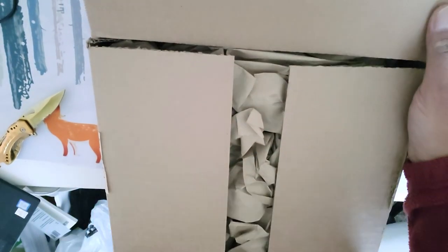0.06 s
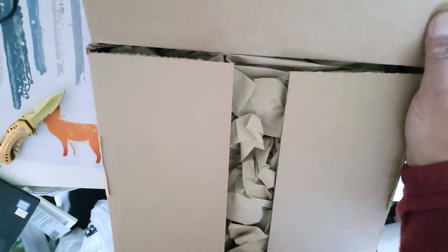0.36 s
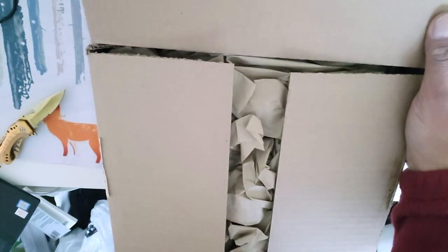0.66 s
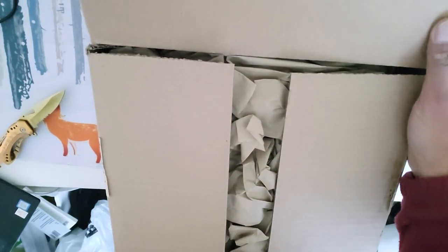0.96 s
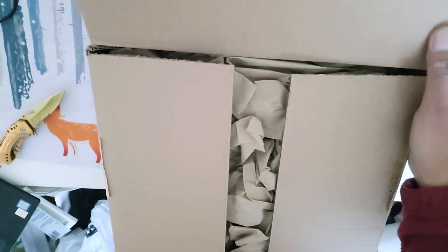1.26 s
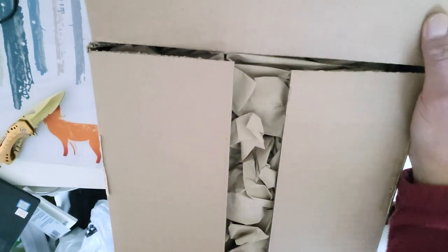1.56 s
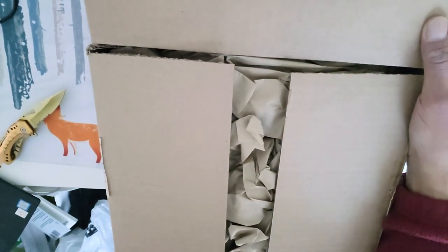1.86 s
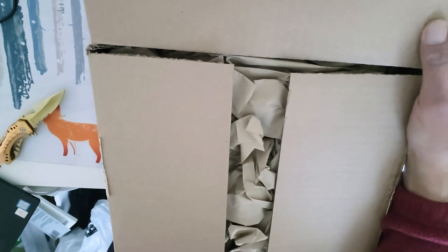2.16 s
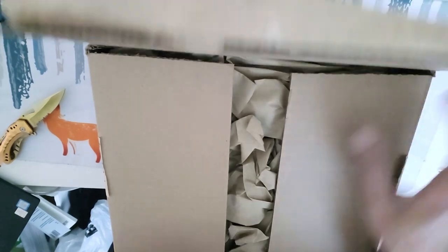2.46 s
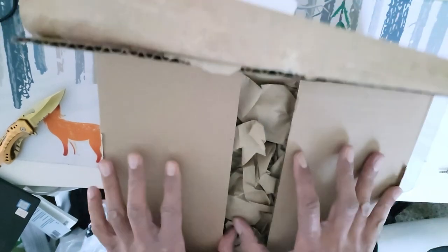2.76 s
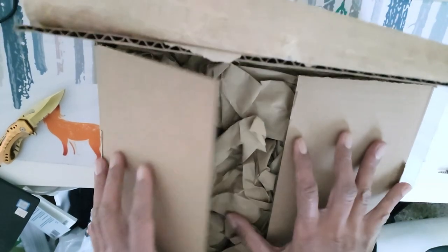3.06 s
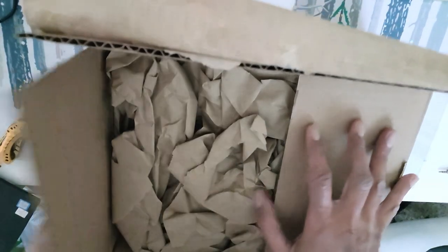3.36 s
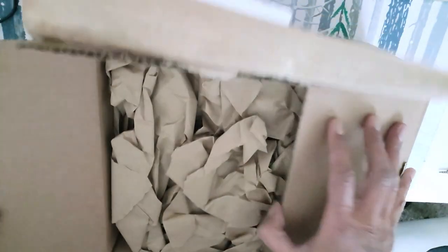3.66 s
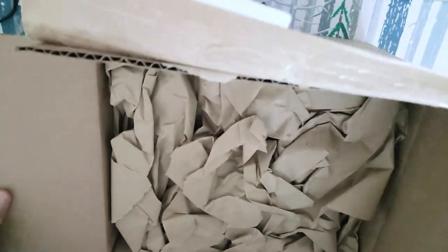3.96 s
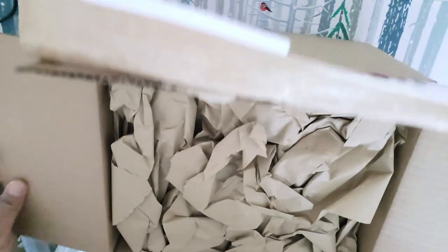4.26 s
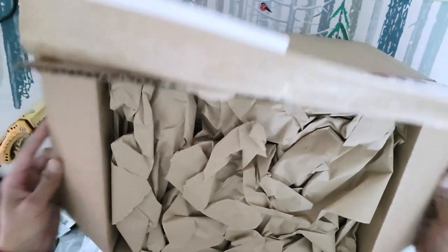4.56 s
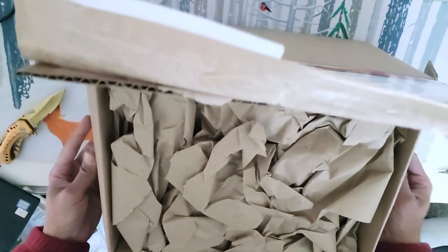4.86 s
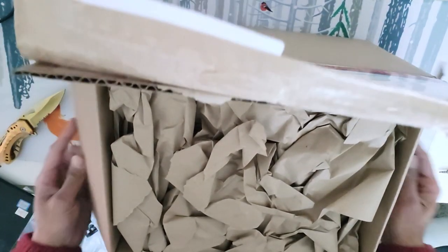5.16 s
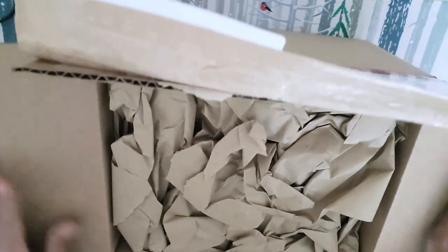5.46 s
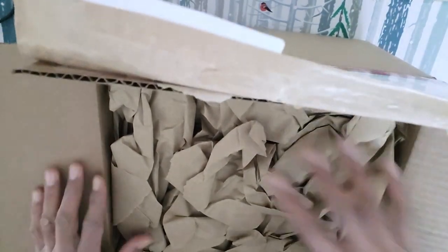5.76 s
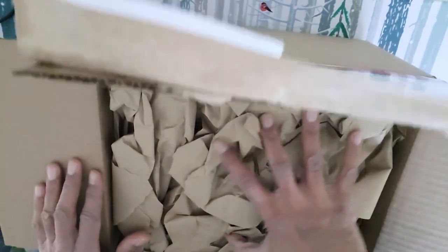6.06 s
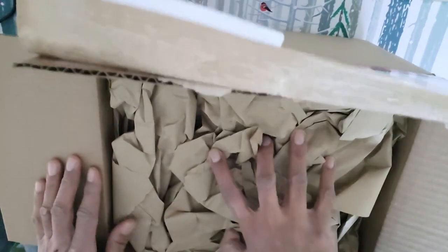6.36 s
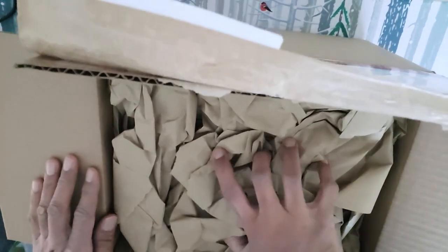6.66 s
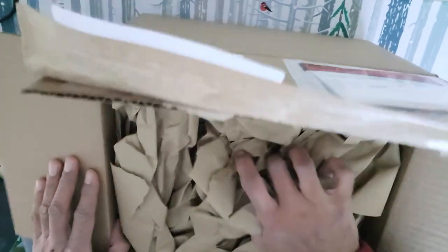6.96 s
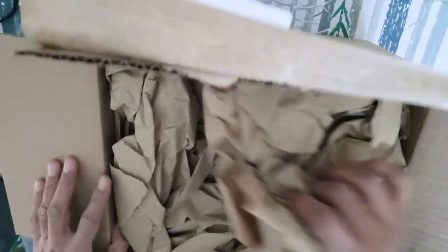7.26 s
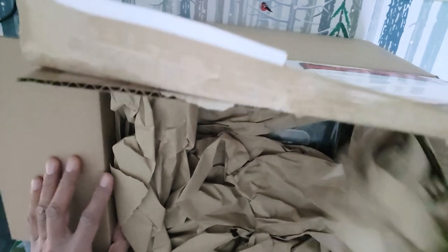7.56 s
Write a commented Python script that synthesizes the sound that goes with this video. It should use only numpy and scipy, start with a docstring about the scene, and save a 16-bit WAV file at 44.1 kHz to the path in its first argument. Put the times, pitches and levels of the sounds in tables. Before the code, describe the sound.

Heard from close by in a quiet little room, skin brushes and briefly judders across a hollow cardboard box. A few taps and clicks follow, then the flaps are folded back in several rasping drags. The last part is the busiest: crumpled paper filling is pushed and grabbed, crinkling densely with dry cracks and a low thump against the box, and it thins out as a wad comes free.

```python
"""Hands slide over a cardboard box and fold its flaps open: rubbing card hisses over the box's hollow tones,
with edge clicks, wall thumps and brief judders as a surface sticks and slips.
Then they press into crumpled packing paper and pull a wad out; it crackles, snaps and collapses in bursts.
A small, quiet room, heard from close by through two microphone ports."""
import sys
import numpy as np
from scipy import signal
from scipy.fft import rfft, irfft
from scipy.io import wavfile
from scipy.ndimage import uniform_filter1d

SR = 44100
rng = np.random.default_rng(int(sys.argv[2]) if len(sys.argv) > 2 else 0)


def transcribe(u):
    """Save the signal u as a 16-bit wav file named by the first command-line argument.

    u: samples, shape (n,) or (channels, n), limited to [-1, 1]; the rate is SR.
    q: integer samples, one column per channel.
    """
    v = np.clip(np.atleast_2d(u).T, -1, 1)
    q = np.round(v * 32767).astype(np.int16)
    wavfile.write(sys.argv[1], SR, q)


N = 343980
TIME, HZ = np.arange(N) / SR, np.fft.rfftfreq(N, 1 / SR)


def amp(db):
    """Decibels to gain."""
    return 10 ** (np.asarray(db) / 20)


def unit(x):
    """Scales to rms 1."""
    return x / np.sqrt(np.mean(x ** 2) + 1e-20)


def curve(points, hz):
    """Reads a table along a logarithmic frequency axis."""
    freqs, values = np.transpose(points)
    return np.interp(np.log(hz + 1), np.log(freqs + 1), values)


def band(hz, lo, hi, order=8):
    """Gain of a pass band with steep skirts."""
    return ((1 + (lo / (hz + 1)) ** order) * (1 + (hz / hi) ** order)) ** -.5


def eq(x, gain):
    """Filters a full-length sound by a gain for each frequency."""
    return irfft(rfft(x) * gain, N)


def add(mix, start_s, sound):
    """Mixes a sound in at its cue."""
    part = mix[:, max(round(start_s * SR), 0):][:, :sound.shape[-1]]
    part += sound[..., :part.shape[1]]


def pulse(t, rise):
    """An envelope that peaks at 1 after the rise time and then dies away."""
    return t / rise * np.exp(1 - t / rise)


# EQ of the quiet room: (frequency [Hz], gain [dB])
ROOM_TONE_EQ = [(12, -30), (20, -2), (472, -2), (873, -13), (1570, -18), (2020, -19), (3250, -12),
                (6910, -18), (7730, -18), (11100, -21), (16000, -25)]
def room_tone(level_db=-69.5):
    """A faint, steady bed of dark noise."""
    noise = rng.standard_normal((2, N))
    return amp(level_db) * unit(eq(noise, amp(curve(ROOM_TONE_EQ, HZ))))


# reverb time of the room: (frequency [Hz], time to fall 60 dB [s])
ROOM_T60 = [(150, 0.52), (600, 0.51), (3500, 0.33), (9000, 0.15), (16000, 0.084)]
def reverb(send, predelay_s=0.0013):
    """The room's diffuse tail, each band dying at its own speed."""
    hz, t, spectra = signal.stft(rng.standard_normal((2, SR // 2)), SR, nperseg=256)
    fade = amp(-60 * t / curve(ROOM_T60, hz)[:, None])
    tail = signal.istft(spectra * fade, SR, nperseg=256)[1]
    tail *= np.clip(np.arange(tail.shape[1]) / SR / predelay_s - 1, 0, 1)
    return signal.fftconvolve(send, tail / np.linalg.norm(tail[0]), axes=1)[:, :N]


# a sticking surface: (time [s], level [dB], pitch [Hz], bandwidth [Hz], rise [s])
JUDDER_CUES = [(0.345, -39, 604, 160, 0.035), (0.384, -39, 253, 69.6, 0.016),
               (1.185, -55.5, 584, 110, 0.019), (1.244, -48.5, 970, 600, 0.019),
               (2.336, -41.5, 497, 160, 0.0089), (2.52, -49, 151, 25, 0.066),
               (4.373, -40, 4870, 700, 0.0063), (4.920, -68, 385, 30, 0.037), (5.07, -68, 470, 120, .03),
               (7.052, -33, 1370, 700, 0.01), (7.297, -29, 453, 162, 0.014), (7.33, -38.5, 356, 222, 0.023)]
def judders():
    """Stick and slip locks briefly to one narrow resonance."""
    out, t = np.zeros((2, N)), np.arange(8192) / SR
    hz = np.fft.rfftfreq(8192, 1 / SR)
    for start, db, pitch, width, rise in JUDDER_CUES:
        tone = irfft(rfft(rng.standard_normal(8192)) / (1 + (2 * (hz - pitch) / width) ** 2))
        envelope = pulse(t, rise) * (1 - (t / t[-1]) ** 2)
        add(out, start, amp(db) * unit(tone * envelope) * np.sqrt(np.mean(envelope ** 2)))
    return out


# blows on the box walls: (time [s], level [dB], pitch [Hz], energy decay [s])
THUMP_CUES = [(1.405, -25.5, 440, 0.0023), (2.604, -24.5, 250, 0.0022), (2.613, -26, 146, 0.0045),
              (2.692, -35, 111, 0.0076), (3.934, -21, 873, 0.0019), (4.370, -31.5, 860, 0.0023),
              (5.691, -43, 55.4, 0.018), (5.767, -38, 98, 0.0071), (6.321, -33, 72, 0.0039),
              (6.889, -21, 64, 0.0092)]
def wall_thumps():
    """A struck wall swings a few times, with a weaker overtone."""
    out, t = np.zeros((2, N)), np.arange(SR // 4) / SR
    for start, db, hz, decay in THUMP_CUES:
        swing = np.sin(2 * np.pi * hz * t) + 0.26 * np.sin(2 * np.pi * hz * 1.4 * t)
        envelope = np.exp(-t / (2 * decay)) * (1 - np.exp(-t * hz * 4))
        add(out, start, amp(db) * swing * envelope)
    return out


# resonances of the open box and its flaps: (centre [Hz], width [Hz], lift at depth 1 [dB])
OPEN_BOX_MODES = [(252, 27, 0), (363, 24, 8), (485, 19, 8), (659, 110, 6), (722, 26, 9), (900, 27, 7),
                  (1136, 290, 6.5), (1464, 170, 8.5), (1750, 59, 4.5), (2540, 180, 4.5), (2660, 170, 0),
                  (3540, 140, 1)]
def box_lift(depth, modes=OPEN_BOX_MODES):
    """The box's resonances in dB at each frequency, deeper the less it is damped."""
    return depth * sum(db / (1 + (2 * (HZ - hz) / width) ** 2) for hz, width, db in modes)


def grains(per_s, spread_db, decay_s, tint, patches=20):
    """Tiny slips or buckles of uneven size; each patch of the sheet has its own short ring."""
    t, out = np.arange(512) / SR, np.zeros((2, N + 512))
    hz = np.fft.rfftfreq(512, 1 / SR)
    sizes = amp(spread_db * np.minimum(rng.exponential(1, N), 4))
    hits = sizes * (rng.random(N) < per_s / SR)
    patch = rng.integers(0, patches, N)
    for k, centre_hz in enumerate(np.geomspace(500, 12000, patches)):
        lift = 1 + tint * np.exp(-np.log2((hz + 1) / centre_hz) ** 2 * 2)
        ring = irfft(rfft(rng.standard_normal((2, 512))) * lift) * np.exp(-t / decay_s)
        out[:, 1:] += signal.oaconvolve((hits * (patch == k))[None], ring, axes=1)
    return unit(out[:, :N])


def smooth(x, span, axis=0):
    """Two passes of a moving average."""
    size = max(round(span), 1)
    return uniform_filter1d(uniform_filter1d(x, size, axis), size, axis)


def shifting_contact(x, depth_db, span_s, clump_db, width_hz=260):
    """As the contact shifts, different patches of the sheet sound, and the slips come in clumps."""
    hz, t, spectra = signal.stft(x, SR, nperseg=512)
    frames = span_s * SR / 256
    patches = smooth(rng.standard_normal(spectra.shape[1:]), width_hz / hz[1])
    patches = unit(smooth(patches, frames, axis=1))
    clumps = unit(smooth(rng.standard_normal(len(t)), frames))
    flicker_db = np.clip(depth_db * patches + clump_db * clumps, -9, 6)
    return signal.istft(spectra * amp(flicker_db), SR, nperseg=512)[1][:, :N]


# how far each register follows a stroke's brightness: (rumble, body, scrape, hiss) [dB per dB]
BRIGHTNESS_TILT = [-0.2, -0.92, -0.095, 0.88]
def stroke_gains(t, peak_s, db, rise, fall, bright_db, rasp_db=0, rumble_db=0):
    """One movement swells and fades, 8.5 dB over its rise or fall; the touch balances the registers."""
    from_peak = np.maximum((peak_s - t) / rise, (t - peak_s) / fall)
    swell_db = db - 8.5 * from_peak ** 1.29  # the exponent rounds the top
    touch_db = bright_db * np.array(BRIGHTNESS_TILT) + [rumble_db, 0, rasp_db, 0]
    return np.outer(amp(touch_db), amp(swell_db))


# registers of wall rumble, hollow body, scrape or crackle, and hiss: (low edge [Hz], high edge [Hz])
REGISTER_BANDS = [(30, 220), (220, 850), (850, 3200), (3200, 16500)]
def rub(friction, strokes, eq_db, trims_db):
    """Colours a friction texture and rides its four registers with the strokes, each with a level trim."""
    t = TIME[::32]
    swells = np.sqrt(sum(stroke_gains(t, *stroke) ** 2 for stroke in strokes))
    spectrum, out = rfft(friction) * amp(eq_db), 0
    for (lo, hi), swell, trim in zip(REGISTER_BANDS, swells, trims_db):
        register = unit(irfft(spectrum * band(HZ, lo, hi), N))
        out = out + register * np.interp(TIME, t, swell) * amp(trim)
    return out


def snaps(cues, trims_db, tone_db, width_octaves, rattle_db, box_depth, ring_db):
    """A stiff facet jumps: a sharp burst, a few cycles at its pitch, a faint rattle between box walls."""
    out, t = np.zeros((2, N)), np.arange(1024) / SR
    hz = np.fft.rfftfreq(1024, 1 / SR)
    box_db = np.interp(hz, HZ, box_lift(box_depth))
    attack = 1 - np.exp(-t / .0002)
    rattle = amp(rattle_db) * pulse(t, rise=.003)
    span_gain = np.sqrt(.005 / t[-1])  # levels are rms over 5 ms
    registers = REGISTER_BANDS[1:]  # body, scrape, hiss
    centres = np.sqrt(np.prod(registers, axis=1))
    for start, peak_db, pitch, skirt, decay in cues:
        register_octaves = abs(np.log2(centres / pitch))
        levels_db = peak_db - skirt * (register_octaves - register_octaves.min())
        octaves = abs(np.log2((hz + 1) / pitch))
        facet = amp(box_db + tone_db / (1 + (octaves / width_octaves) ** 2) - .7 * skirt * octaves)
        ring = np.sin(2 * np.pi * pitch * t) * np.exp(-t / (2 * decay))
        for k, ((lo, hi), db, trim) in enumerate(zip(registers, levels_db, trims_db)):
            noise = rng.standard_normal((2 if k else 1, 1024))  # the body is mono
            noise = irfft(rfft(noise) * facet * band(hz, lo, hi, order=6))
            stretch = (registers[-1][0] / lo) ** .4  # low tones take longer to fade
            burst = unit(noise * (attack * np.exp(-t / (decay * stretch)) + rattle))
            if lo <= pitch < hi:
                burst += amp(ring_db) * unit(ring)
            add(out, start, amp(db + trim) * unit(burst) * span_gain)
    return out


# paper creases: (time [s], level before trims [dB], pitch [Hz], skirt across registers [dB/octave])
CREASE_CUES = [(5.872, -41.5, 3400, 2), (5.8894, -28.5, 6470, 2), (6.0121, -29, 5780, 4.5),
               (6.0256, -27, 5170, 10), (6.0558, -51, 3300, 7), (6.1306, -37, 4960, 9),
               (6.2311, -28, 9160, 2.5), (6.3183, -23.5, 5600, 1.5), (6.5404, -20, 2650, 6),
               (6.5645, -27, 7460, 2), (6.6002, -23, 3230, 3), (6.6626, -24.5, 1970, 8),
               (6.7001, -24, 2780, 4.5), (6.7195, -27.5, 10000, 5), (6.756, -22.5, 3720, 8.5),
               (6.8234, -24.5, 2620, 2), (6.831, -24, 4000, 9), (6.88, -19.5, 900, 0.5),
               (6.8847, -25, 7900, 11), (6.9827, -30.5, 8200, 2), (7.011, -25.5, 7100, 11),
               (7.025, -25, 1160, 2), (7.161, -29, 4840, 3.5), (7.1751, -25, 3300, 10),
               (7.2006, -29, 930, -0.5), (7.214, -21, 5500, 5), (7.2645, -30.5, 2050, -0.5),
               (7.4933, -39, 1470, 4.5), (7.5671, -31.5, 3960, 4), (7.6007, -34.5, 7200, 5.5),
               (7.6701, -28.5, 3240, 5.5), (7.7451, -42.5, 2630, 10)]
def crease_snaps(decay_s=0.001):
    """Creases in the paper snap through with a short, dry crack."""
    cues = [(*cue, decay_s) for cue in CREASE_CUES]
    return snaps(cues, trims_db=[-1.5, 1, 1.5], tone_db=5, width_octaves=0.27,
                 rattle_db=-20, box_depth=0.42, ring_db=-6)


# pushes and grabs in the paper: (peak time [s], level before trims [dB], rise [s], fall [s], brightness [dB])
PAPER_STROKES = [(5.879, -43, 0.011, 0.15, -2.5), (6.08, -37.5, 0.084, 0.054, 0),
                 (6.2, -37.5, 0.096, 0.16, -1), (6.34, -38, 0.12, 0.12, 1.5), (6.47, -37.5, 0.12, 0.15, -7),
                 (6.575, -28.5, 0.053, 0.055, -1), (6.7, -35, 0.019, 0.046, -2.5),
                 (6.79, -32, 0.023, 0.16, -1.5), (6.89, -25, 0.016, 0.089, -2.5),
                 (7.07, -32.5, 0.061, 0.11, -2.5), (7.19, -31.5, 0.068, 0.061, -2.5),
                 (7.309, -32, 0.058, 0.081, -1), (7.45, -41, 0.082, 0.051, 2.5),
                 (7.6, -48, 0.042, 0.072, 1), (7.68, -51, 0.014, 0.095, -1.5)]
# whole folds collapsing in a rush of crackle: (peak time [s], lift [dB], half length [s])
FOLD_COLLAPSES = [(6.322, 7, 0.01), (6.594, 4.5, 0.013), (6.881, 9, 0.013), (6.931, -1, 0.0041)]
# EQ of the packing paper: (frequency [Hz], gain [dB])
PAPER_EQ = [(18, -38), (30, -8), (70, -1), (138, -5), (287, -8), (328, -12), (473, -4.5), (913, -4),
            (1630, -0.5), (3770, -5.5), (6380, -9), (7670, -11.5), (16000, -9.5)]
def paper_rustle():
    """Small crinkles over a bed of sheets sliding on each other, surging when a fold gives way."""
    crinkles = grains(per_s=800, spread_db=4.2, decay_s=.0011, tint=3)
    sliding = amp(4) * rng.standard_normal((2, N))
    rustle = shifting_contact(crinkles + sliding, depth_db=1.5, span_s=.018, clump_db=1.8)
    surge_db = sum(db * np.exp(-((TIME - peak_s) / half) ** 2) for peak_s, db, half in FOLD_COLLAPSES)
    eq_db = curve(PAPER_EQ, HZ) + box_lift(depth=0.4)
    return amp(surge_db) * rub(rustle, PAPER_STROKES, eq_db, trims_db=[-16.5, -5.5, -2, 3])


# card edges: (time [s], level before trims [dB], pitch [Hz], skirt across registers [dB/octave],
# base decay [s])
EDGE_CUES = [(0.0501, -27, 690, 0.3, 0.00068), (0.0603, -45, 720, -4, .003), (1.4045, -34, 1190, 8, 0.0027),
             (1.4716, -46, 1570, 1.5, .0023), (2.1519, -60, 900, 2.5, 0.0043),
             (2.2231, -56, 3020, 4, 0.00088), (2.3386, -36.5, 900, 12, 0.002),
             (2.6042, -35.5, 660, 8, .001), (2.6457, -29, 5800, 0.5, 0.0025),
             (2.6586, -28, 5470, 0, 0.0016), (3.1661, -40, 2580, 6, .001),
             (3.2777, -41.5, 3380, -1, 0.0011), (3.2989, -28.5, 5370, 3, .0016),
             (3.6035, -34.5, 8050, 1, 0.00041), (3.9338, -22, 5140, 3, 0.0011),
             (4.3701, -37, 2800, 7, 0.0014), (5.6193, -63, 5250, 1.5, 0.0025)]
def edge_clicks():
    """Card edges catch and let go, each click coloured by the box."""
    return snaps(EDGE_CUES, trims_db=[0, 1, 1], tone_db=6, width_octaves=0.24,
                 rattle_db=-24.5, box_depth=1.0, ring_db=-8)


def card_friction():
    """Skin and card edges slip over the fibres thousands of times a second."""
    slips = grains(per_s=7000, spread_db=1, decay_s=0.00074, tint=0.38)
    return shifting_contact(slips, depth_db=2, span_s=.03, clump_db=0.16)


# flap drags: (peak time [s], level before trims [dB], rise [s], fall [s], brightness [dB], rasp [dB])
FLAP_STROKES = [(3.029, -55, 0.018, 0.031, 2, 7), (3.21, -50.5, 0.13, 0.26, 1, 3.5),
                (3.36, -44.5, 0.076, 0.14, 5.5, 3), (3.569, -38, 0.11, 0.096, -1.5, -4),
                (3.92, -47.5, 0.1, .03, 2, -6.5), (3.944, -37.5, 0.011, 0.14, 5.5, -2.5),
                (4.31, -44, 0.34, 0.074, -1.5, -5.5), (4.55, -48, 0.049, 0.047, 0, 2),
                (4.653, -49.5, 0.066, 0.04, -1, 8), (4.768, -54, 0.15, 0.067, -1.5, 3),
                (5.21, -49.5, 0.011, 0.036, -2, -6), (5.305, -45, 0.069, 0.047, 4, -2),
                (5.49, -51.5, 0.14, 0.04, 4.5, -7.5), (5.698, -54.5, 0.011, 0.096, 1.5, -0.5)]
# EQ of the flaps while folding, and while held upright: (frequency [Hz], gain [dB])
FOLDING_EQ = [(18, -53), (30, -22), (59, -8), (165, -7.5), (273, -11.5), (355, -3.5), (486, -2),
              (1010, -10.5), (1500, -3), (3670, -11.5), (7670, -11), (16000, -8.5)]
UPRIGHT_EQ = [(18, -57), (30, -21), (64, -10), (184, -17), (473, -3), (988, -18.5), (1540, -10.5),
              (2060, -16.5), (2540, -16), (4530, -25), (9220, -19.5), (16000, -18)]
def flap_drags(friction, grip_s=4.47):
    """The flaps drag open; from grip_s both hands hold them upright, where they ring most freely."""
    folding_db = curve(FOLDING_EQ, HZ) + box_lift(depth=0.61)
    upright_db = curve(UPRIGHT_EQ, HZ) + box_lift(depth=1.25)
    folding = rub(friction, FLAP_STROKES, folding_db, trims_db=[-16.5, -4, -2, 0.5])
    upright = rub(friction, FLAP_STROKES, upright_db, trims_db=[-16.5, 0, -0.5, 0])
    return np.where(TIME < grip_s, folding, upright)


# hand slides: (peak time [s], level before trims [dB], rise [s], fall [s], brightness [dB], rasp [dB],
# wall rumble [dB])
HAND_STROKES = [(0.01, -39, 0.059, 0.11, 0.5, -2.5, -3), (0.412, -33, 0.12, 0.082, -1, -4, -3),
                (0.7, -60.5, 0.13, 0.14, -1, 2.5, 6.5), (1.07, -66, 0.22, 0.45, 2.5, -2, -9),
                (1.27, -49.5, 0.068, 0.036, -6, 2.5, -14), (1.45, -52.5, 0.11, .07, -3, 2.5, 8),
                (1.79, -65.5, 0.24, 0.12, 7.5, 2.5, -14), (1.9, -65, 0.097, 0.11, -2, 8.5, 9.5),
                (2.338, -43, 0.069, 0.057, 0.5, 1, -3.5), (2.45, -54, 0.06, 0.12, 1.5, -3, 3),
                (2.6, -50, 0.13, 0.11, -2, 0, 6), (2.665, -34.5, 0.045, 0.041, -2.5, -3, -1),
                (2.779, -40, 0.043, 0.051, -1, 2, -7), (2.92, -53.5, 0.21, 0.026, 6.5, 8.5, 4)]
# EQ of skin on card: (frequency [Hz], gain [dB])
HAND_EQ = [(18, -39), (30, -12), (66, -6), (170, -9), (245, -12.5), (330, -7.5), (400, 0), (630, -2.5),
           (780, -5.5), (1000, -12), (1460, -13.5), (3700, -21.5), (9000, -21.5), (16000, -19)]
# resonances of the shut box and the hollows between them: (centre [Hz], width [Hz], lift at depth 1 [dB])
SHUT_BOX_MODES = [(236, 45, 10.5), (338, 55, -4), (486, 120, 2), (685, 170, -3.5), (860, 200, -10),
                  (1520, 570, 2), (3930, 1100, -1), (5300, 1000, 0)]
def hand_slides(friction):
    """Hands rub the shut box, a dry hiss over its hollow tones."""
    eq_db = curve(HAND_EQ, HZ) + box_lift(depth=0.59, modes=SHUT_BOX_MODES)
    return rub(friction, HAND_STROKES, eq_db, trims_db=[-6.5, -5, -3.6, -0.6])


def scene():
    """A rubbing bus and an impact bus, each with its own reverb send, over room tone."""
    friction = card_friction()
    rubbing = hand_slides(friction) + flap_drags(friction) + paper_rustle()
    impacts = edge_clicks() + crease_snaps() + wall_thumps() + judders()
    send = amp(-14.5) * rubbing + amp(-11.5) * impacts
    return room_tone() + reverb(send) + rubbing + impacts


# how alike the two ports hear: (frequency [Hz], likeness [0 leaves the width, 1 or more is nearly mono])
PORT_LIKENESS = [(60, .88), (200, 0.8), (380, 1.1), (700, 0.5), (1300, 0.57), (2400, 0.33), (4500, 0.03),
                 (9000, 0)]
# each port's own colour: (frequency [Hz], gain [dB])
LEFT_EQ = [(60, -0.2), (1000, -2.5), (4000, 0.07), (6500, 0.5), (7700, 5.5), (9000, -6), (10500, -6),
           (12500, -4), (16000, -5.5)]
RIGHT_EQ = [(60, -4), (1000, -5.5), (4000, -3.5), (6500, -2.5), (7700, -2), (9200, 3), (10500, -2.5),
            (12500, -8.5), (16000, -1.5)]
def record(dry, low_cut_hz=38, high_cut_hz=16000, right_lag_s=.00013):
    """Two close ports hear the bass alike; each has its own treble resonance; both ends roll off."""
    dry = signal.sosfilt(signal.butter(2, low_cut_hz, "highpass", fs=SR, output="sos"), dry)
    likeness = np.clip(curve(PORT_LIKENESS, HZ), -.99, .99)
    mid = eq(dry[0] + dry[1], np.sqrt(1 + likeness)) / 2
    side = eq(dry[0] - dry[1], np.sqrt(1 - likeness)) / 2
    lag = np.exp(-2j * np.pi * HZ * right_lag_s)  # the box lies nearer the left port
    left = eq(mid + side, amp(curve(LEFT_EQ, HZ)))
    right = eq(mid - side, amp(curve(RIGHT_EQ, HZ)) * lag)
    high_cut = signal.firwin(511, high_cut_hz, window=("kaiser", 9), fs=SR)
    return signal.oaconvolve([left, right], high_cut[None], "same")


dry = scene()
out = record(dry)
transcribe(out)
```